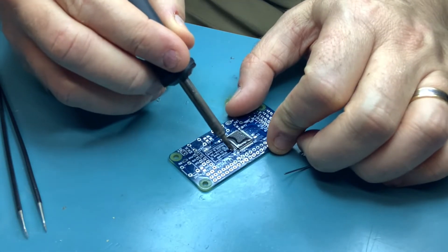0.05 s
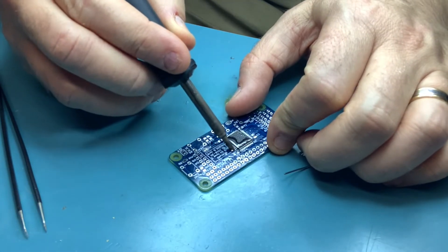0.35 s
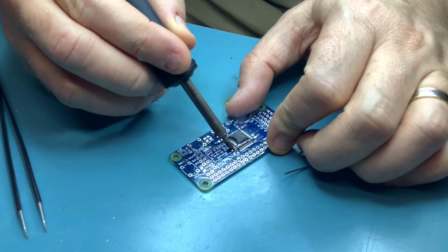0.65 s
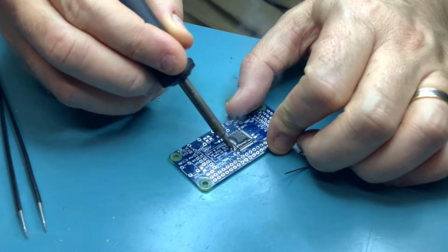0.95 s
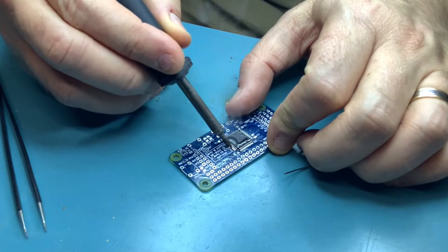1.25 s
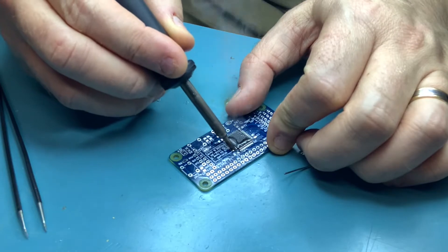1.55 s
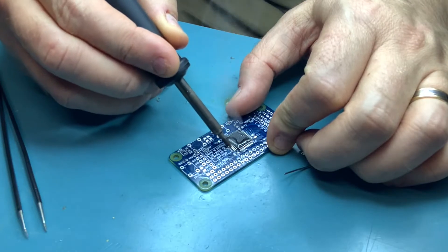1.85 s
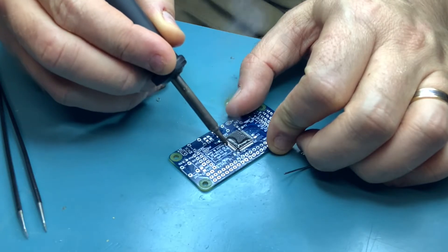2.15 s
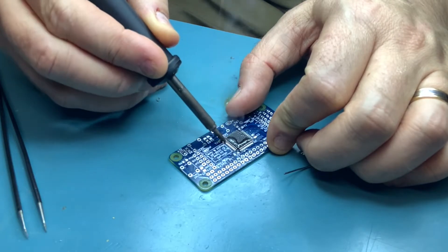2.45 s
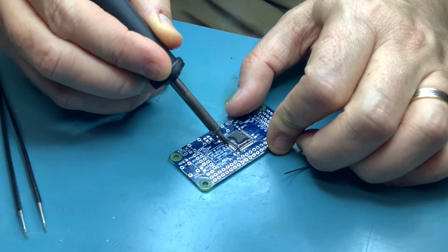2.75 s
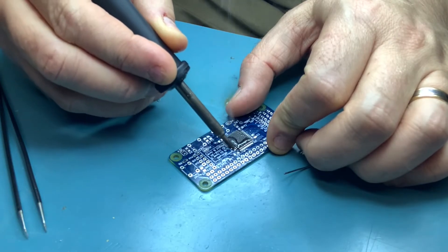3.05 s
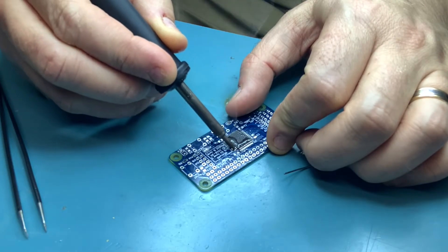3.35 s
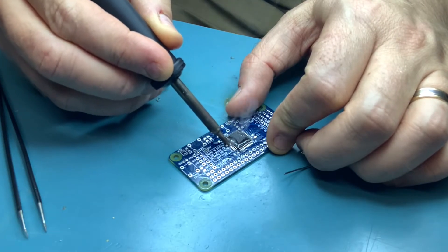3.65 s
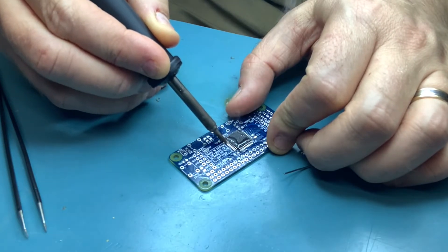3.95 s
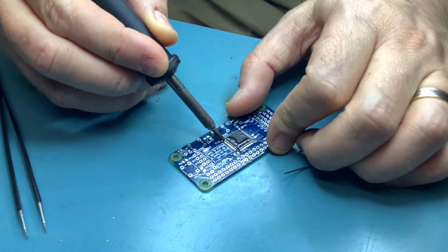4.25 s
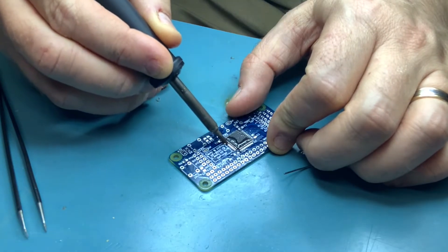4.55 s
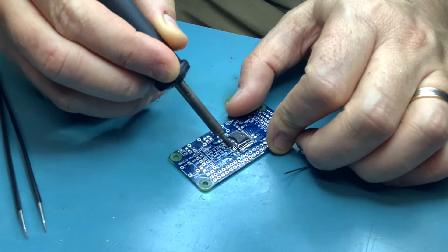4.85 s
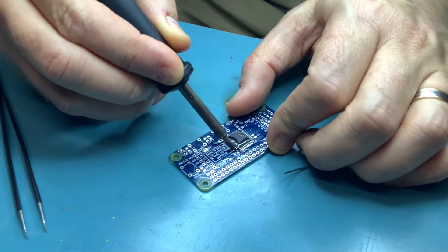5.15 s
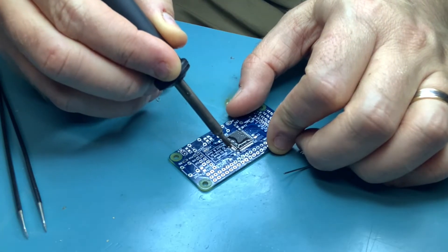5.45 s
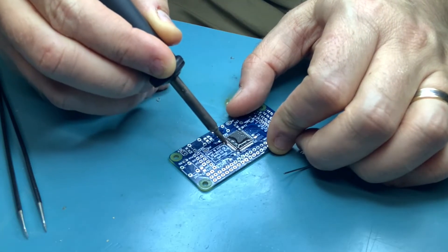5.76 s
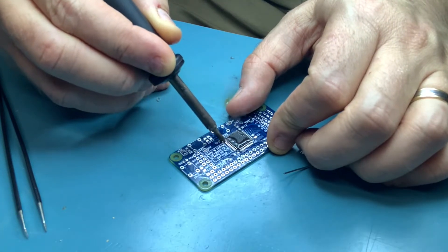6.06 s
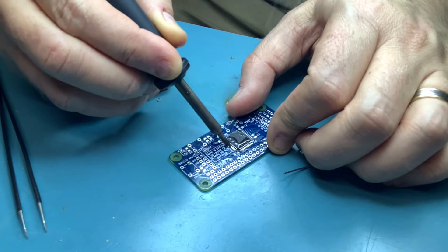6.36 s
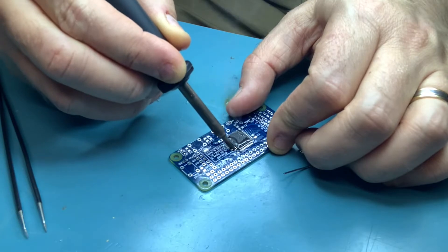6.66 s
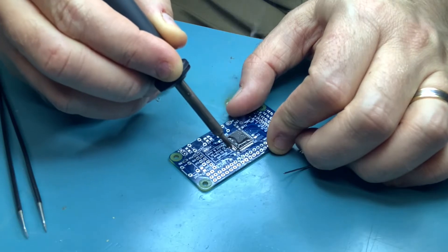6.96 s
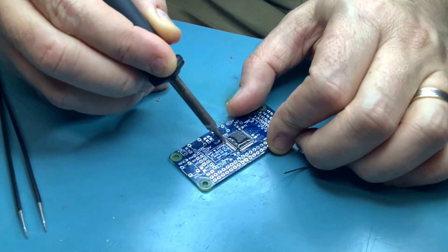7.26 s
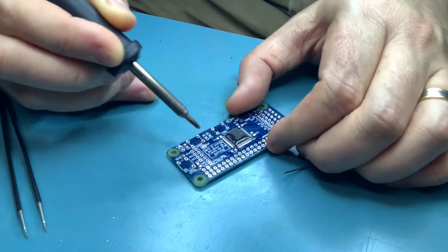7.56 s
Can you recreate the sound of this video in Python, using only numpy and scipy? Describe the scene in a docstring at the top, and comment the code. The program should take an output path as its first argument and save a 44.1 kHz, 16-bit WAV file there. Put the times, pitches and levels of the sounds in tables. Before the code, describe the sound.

Flux sizzles and spits in strokes under a soldering iron on a circuit board, over a steady low electrical hum.

```python
"""At a workbench, a soldering iron is dragged along the pins of a chip on a small circuit board.
Flux boils under the tip: countless tiny bubbles burst into a bright sizzle, larger ones spit,
lone ones tick. Board, hands and bench colour every burst. The tip knocks and rubs on the board.
A mains transformer hums over a low room rumble."""
import sys
import numpy as np
from scipy import signal
from scipy.fft import rfft, irfft, next_fast_len
from scipy.io import wavfile

SR = 44100
rng = np.random.default_rng(int(sys.argv[2]) if len(sys.argv) > 2 else 0)


def materialize(psi):
    """Save the field psi as 16-bit PCM at rate SR to the path in sys.argv[1].

    A 1-D psi becomes a single channel; in a 2-D psi each row is a channel.
    """
    bounded = np.clip(np.atleast_2d(psi).T, -1, 1)
    quanta = np.round(bounded * 32767).astype(np.int16)
    wavfile.write(sys.argv[1], SR, quanta)


N = 335107
TIME_S = np.arange(N) / SR

# room rumble and hiss: freq_hz, density_db
ROOM_SPECTRUM = [(3, -61.5), (12, -56.5), (21, -77), (42, -78), (52, -72.5), (64, -82.5), (95, -80.5),
                 (118, -94.5), (175, -94.5), (260, -102), (650, -109), (900, -114), (1550, -115),
                 (3000, -119.5), (15000, -124)]
# transformer hum: mains_multiple, rms_db
HUM_HARMONICS = [(2, -59), (3, -79.5), (4, -65), (6, -99), (8, -83), (10, -102.5), (12, -85.5), (16, -93)]
# broad spectrum of one burst: freq_hz, gain_db
BUBBLE_SPECTRUM = [(60, -37), (160, -29.5), (250, -20.5), (500, -14), (900, -14), (1200, -15.5),
                   (1800, -27), (2600, -12), (4200, -12.5), (7000, -8), (10500, -7.5), (13000, -2),
                   (15600, -14.5)]
# peaks and notches of the board and the hollow between the hands: centre_hz, width_hz, gain_db
BOARD_RESONANCES = [(596, 59, -5.8), (898, 132, -13.0), (1096, 83, 7.4), (1323, 107, 8.5), (1860, 227, 9.8),
                    (2248, 50, 5.8), (2526, 71, 6.9), (3103, 68, -10.0), (3383, 50, -11.0),
                    (3583, 50, -8.9), (4008, 96, -7.8), (4210, 63, -6.4), (4330, 140, 6.3),
                    (4657, 405, -13.0), (4998, 825, 9.8), (5498, 321, -6.9), (5936, 185, -8.3),
                    (7529, 121, -5.9), (8317, 514, -13.0), (8708, 1200, 11.4), (9353, 91, 4.8),
                    (10476, 69, -5.7), (11680, 204, -6.7), (12183, 185, -10.4), (12475, 88, -9.8),
                    (12983, 104, -9.4), (13287, 464, -11.9), (14007, 257, -5.5), (14930, 268, -8.7),
                    (15605, 105, -10.5)]
# the colour of the bursts shifts as the strokes go on; tip position weights the 9 kHz ring: time_s, low_db,
# ring_db, top_db
BURST_COLOUR = [(0.7, 1.5, -4.5, 6), (1.5, -1.9, -2, 6.5), (2.4, -0.9, -0.2, 4), (3.8, 0.5, 0.2, 7),
                (4.55, 4, -0.5, 3), (5.7, -2.5, 0, 4), (6.3, -4, -2, 6), (7.35, -4, -1, 6)]
# reflections off things on the bench: delay_ms, gain_db
BENCH_ECHOES = [(3.945, -16), (9.7, -24)]
# brief dabs at the flux: start_s, length_s, boil_db
TIP_DABS = [(0.21, 0.013, -58), (0.275, 0.04, -50), (2.78, 0.04, -57), (4.01, 0.032, -67),
            (4.125, 0.027, -54), (4.225, 0.068, -73.5), (4.463, 0.0073, -64), (4.497, 0.087, -61),
            (4.514, 0.032, -50), (4.868, 0.02, -72.5), (5.072, 0.0097, -79), (5.538, 0.024, -69),
            (5.61, 0.057, -72), (6.58, 0.14, -69.5), (6.728, 0.026, -50.5), (6.8, 0.1, -56.5),
            (6.9, 0.14, -64), (7.53, 0.065, -75.5)]
# one long stroke along the pins: time_s, boil_db
LONG_STROKE = [(0.314, -44.5), (0.479, -45.5), (0.933, -41.5), (1.013, -45.5), (1.122, -42), (1.142, -43.5),
               (1.227, -42.0), (1.387, -46.5), (2.045, -44.0), (2.07, -54.5), (2.11, -45.5), (2.14, -57),
               (2.16, -41.5), (2.2, -52.5), (2.295, -47.5), (2.325, -50), (2.519, -45.5), (2.669, -55.5),
               (2.749, -48.5), (2.769, -49.5)]
# four shorter strokes, a curve each: time_s, boil_db
SHORT_STROKES = [
    [(2.829, -45), (2.948, -48.5), (3.043, -52), (3.063, -44), (3.248, -56), (3.412, -48), (3.612, -51.5),
     (3.632, -61.5), (3.652, -51)],
    [(3.756, -48.5), (3.786, -51), (3.891, -49.5), (3.986, -61)],
    [(5.667, -51), (5.732, -45.5), (5.797, -48), (6.081, -48), (6.221, -53), (6.266, -59), (6.361, -47.5),
     (6.535, -56)],
    [(7.004, -50), (7.069, -54), (7.089, -59), (7.119, -51.0), (7.278, -50.5), (7.383, -58.5), (7.413, -56)],
]
# tip lands or drops between pins: start_s, level_db, contact_cutoff_hz
TIP_KNOCKS = [(0.268, -71.5, 2000), (0.282, -52, 250), (3.351, -64.5, 870), (4.739, -49.5, 149),
              (6.056, -64, 610)]
# board on its rubber mat: pitch_hz, gain_db, t60_s
BOARD_MODES = [(174, -1.5, 0.13), (307, -4, 0.07), (408, 7, 0.033), (494, -2, 0.054), (675, 10.5, 0.045),
               (1570, 15, 0.039)]
# large bubbles: start_s, level_db
LARGE_SPITS = [(0.3438, -30.0), (0.6617, -25.0), (1.6304, -29.5), (1.8264, -28.0), (1.8674, -29.0),
               (2.0404, -28.5), (2.1124, -31.5), (2.5228, -29.0), (2.5454, -31.0), (2.5968, -31.5),
               (2.7506, -33.0), (2.809, -34.5), (2.8266, -27.5), (2.9476, -30.5), (3.1854, -30.0),
               (3.3399, -29.0), (3.3538, -27.0), (3.4656, -31.5), (3.7092, -41.0), (3.7539, -34.5),
               (3.9558, -37.5), (3.9679, -34.5), (4.0049, -36.5), (4.0644, -47.0), (4.4923, -48.0),
               (4.5109, -32.0), (4.5427, -36.0), (4.5674, -29.5), (4.5948, -41.0), (4.6105, -40.0),
               (5.6058, -50.0), (5.6624, -40.0), (5.899, -31.5), (6.0814, -27.0), (6.3054, -34.5),
               (6.6399, -46.0), (6.6959, -46.0), (6.8256, -34.0), (6.8538, -41.0), (7.0003, -34.5),
               (7.2474, -32.0), (7.2689, -32.5), (7.2815, -28.5)]
# tip rubs over the pins: start_s, length_s, level_db
TIP_RUBS = [(1.697, 0.076, -68.5), (3.353, 0.17, -76), (3.796, 0.18, -77), (4.513, 0.11, -70.5),
            (5.3, 0.19, -71), (6.054, 0.36, -72), (6.827, 0.27, -71.5)]

CUTOFF_HZ = 15800
RING_FFT_SAMPLES = 8192
BURSTS_PER_S, REFERENCE_BOIL_DB = 7000, -45  # rate at that boil level
FLARE_DB_PER_S, QUENCH_DB_PER_S = 2998, 1150  # tip meets flux, tip leaves
SIMMER_DB, SIMMER_FADE_DB_PER_S = -30, 61  # relative to the contact
SMALL_SPITS_PER_S, SMALL_SPIT_DB, SMALL_SPIT_SPREAD_DB = 16, 10, 2.5  # relative to the boil


def from_db(db):
    """Decibels to gain."""
    return 10 ** (np.asarray(db) / 20)


def unit_rms(x):
    """Scale to rms 1."""
    return x / np.sqrt(np.mean(x ** 2) + 1e-20)


def in_time(rows):
    """Each column of a curve at every sample."""
    times_s, *columns = np.transpose(rows)
    return [np.interp(TIME_S, times_s, column) for column in columns]


def at_hz(points, hz):
    """Spectrum in dB, interpolated over log frequency."""
    points_hz, db = np.transpose(points)
    return np.interp(np.log(np.maximum(hz, 1)), np.log(points_hz), db)


def peak(hz, centre_hz, width_hz):
    """Resonance curve of height 1."""
    return 1 / (1 + (2 * (hz - centre_hz) / width_hz) ** 2)


def noise(gain_at):
    """Gaussian noise shaped by a gain over frequency."""
    size = next_fast_len(N)
    hz = np.arange(size // 2 + 1) * SR / size
    return irfft(rfft(rng.standard_normal(size)) * gain_at(hz), size)[:N]


def drift(rate_hz):
    """Smooth random wander, rms 1."""
    return unit_rms(noise(lambda hz: hz / rate_hz / (1 + (hz / rate_hz) ** 2) ** 2))


def decay(impulses, fade_s):
    """Exponential tail on each impulse."""
    return signal.lfilter([1], [1, -np.exp(-1 / (fade_s * SR))], impulses + 1e-18)


def held_db(start_s, length_s, level_db, rise_db_per_s, fall_db_per_s):
    """Contact level: rise, hold, fall."""
    before_s = np.maximum(start_s - TIME_S, 0)
    after_s = np.maximum(TIME_S - start_s - length_s, 0)
    return level_db - rise_db_per_s * before_s - fall_db_per_s * after_s


def band(x, centre_hz, width_hz):
    """One broad resonant band."""
    return signal.lfilter(*signal.iirpeak(centre_hz, centre_hz / width_hz, fs=SR), x)


def room(drone_hz, drone_width_hz, drone_db):
    """Rumble falling into faint hiss, plus a narrow building drone."""
    drone = from_db(drone_db) * unit_rms(noise(lambda hz: peak(hz, drone_hz, drone_width_hz)))
    return drone + np.sqrt(SR / 2) * noise(lambda hz: from_db(at_hz(ROOM_SPECTRUM, hz)))


def hum(mains_hz, waver_db):
    """Transformer: mains harmonics, each wavering slightly."""
    out = np.zeros(N)
    for multiple, rms_db in HUM_HARMONICS:
        amplitude = np.sqrt(2) * from_db(rms_db - waver_db * drift(rate_hz=7.3))
        out += amplitude * np.sin(2 * np.pi * (multiple * mains_hz * TIME_S + rng.random()))
    return out


def ticks(per_s, level_db, spread_db):
    """Lone faint bubbles in flux left on the hot pins."""
    born = rng.random(N) < per_s / SR
    return born * from_db(level_db + spread_db * rng.standard_normal(N))


def disperse(spectrum, hz, spread_ms, round_trip_ms, feedback):
    """Bending waves run to and fro in the board; lows arrive later."""
    phase_per_ms = -2j * np.pi * hz / 1000
    lag = np.exp(phase_per_ms * spread_ms * (1 - hz / (2 * CUTOFF_HZ)))
    trip = np.exp(phase_per_ms * round_trip_ms)
    return spectrum * lag * (feedback + trip) / (1 + feedback * trip)


def board_ring():
    """Board response to one burst, peak 1."""
    half = RING_FFT_SAMPLES // 2
    hz = np.arange(half + 1) * SR / RING_FFT_SAMPLES
    db = at_hz(BUBBLE_SPECTRUM, hz)
    for centre_hz, width_hz, gain_db in BOARD_RESONANCES:
        db += gain_db * peak(hz, centre_hz, width_hz)
    # minimum phase: sharp front, ringing after
    cepstrum = irfft(np.log(from_db(db)))
    cepstrum[1:half] *= 2
    cepstrum[half + 1:] = 0
    spectrum = disperse(np.exp(rfft(cepstrum)), hz, spread_ms=0.8, round_trip_ms=0.72, feedback=0.8)
    ring = irfft(spectrum)[:half]
    return ring / np.abs(ring).max()


def bench(x, scatter_db, scatter_t60_s, room_db, room_t60_s):
    """Near reflections, quick scatter off clutter, faint room tail."""
    t = TIME_S[:SR // 3]
    response = np.zeros(len(t))
    response[0] = 1
    for delay_ms, gain_db in BENCH_ECHOES:
        response[round(delay_ms * SR / 1000)] += from_db(gain_db)
    for gain_db, t60_s in (scatter_db, scatter_t60_s), (room_db, room_t60_s):
        tail = rng.standard_normal(len(t)) * from_db(-60 * t / t60_s) * (t > 0.003)
        response += from_db(gain_db) * tail / np.linalg.norm(tail)
    return signal.fftconvolve(x, response / np.linalg.norm(response))[:N]


def boil(stroke_gain_db):
    """Boil level in dB: each contact flares, holds, then leaves a simmer."""
    strokes = [(rows[0][0], rows[-1][0] - rows[0][0], in_time(rows)[0] + stroke_gain_db)
               for rows in [LONG_STROKE, *SHORT_STROKES]]
    boil_db = np.full(N, -120.0)
    for start_s, length_s, level_db in strokes + list(TIP_DABS):
        contact_db = held_db(start_s, length_s, level_db, FLARE_DB_PER_S, QUENCH_DB_PER_S)
        simmer_db = held_db(start_s, length_s, level_db + SIMMER_DB, FLARE_DB_PER_S, SIMMER_FADE_DB_PER_S)
        boil_db = np.maximum(boil_db, np.maximum(contact_db, simmer_db))
    return boil_db


def swarms(per_s, fade_s, depth):
    """Sizzle gain: a collapse sets off a dying swarm of smaller ones."""
    starts = (rng.random(N) < per_s / SR) * rng.random(N)
    return 1 + depth * decay(starts, fade_s)


def sizzle(boil_db, spread_db, cap_sigma, surge_db, surge_hz, rate_exponent):
    """Tiny bubbles click in sputters; a harder boil makes more."""
    per_s = BURSTS_PER_S * from_db(rate_exponent * (boil_db - REFERENCE_BOIL_DB))
    chance = np.clip(per_s / SR, 0, 1)
    born = rng.random(N) < chance
    sizes = unit_rms(from_db(spread_db * np.minimum(rng.standard_normal(N), cap_sigma)))
    swarm = swarms(per_s=180, fade_s=0.00066, depth=1.1)
    sputter = unit_rms(swarm * from_db(-surge_db * drift(surge_hz)))
    signs = rng.choice([-1, 1], N)
    return born * signs * sizes / np.sqrt(chance) * sputter * from_db(boil_db)


def vapour(boil_db, share_db):
    """Escaping vapour: smooth hiss between bursts."""
    return from_db(boil_db + share_db) * rng.standard_normal(N)


def flux():
    """Sizzle, vapour, spits and ticks ring through the same board."""
    boil_db = boil(stroke_gain_db=-0.46)
    ring = board_ring()
    boiling = sizzle(boil_db, spread_db=7.0, cap_sigma=3.17, surge_db=0.7, surge_hz=160,
                     rate_exponent=0.75)
    boiling += vapour(boil_db, share_db=-14)
    drive = boiling / np.linalg.norm(ring)
    drive += spits(boil_db, large_gain_db=-1.3, spray_db=-25.5, spray_fade_s=0.0018)
    drive += ticks(per_s=29, level_db=-65.5, spread_db=0.5)
    sound = signal.fftconvolve(drive, ring)[:N]
    low_db, ring_db, top_db = in_time(BURST_COLOUR)
    low_pass = signal.butter(1, 2680, fs=SR, output="sos")
    sound += (from_db(low_db) - 1) * signal.sosfilt(low_pass, sound)
    sound += (from_db(ring_db) - 1) * band(sound, centre_hz=9100, width_hz=1900)
    sound += (from_db(top_db) - 1) * band(sound, centre_hz=14100, width_hz=1730)
    return bench(sound, scatter_db=-14.0, scatter_t60_s=0.04, room_db=-11.5, room_t60_s=0.25)


def knocks():
    """The board gives on its mat; soft contact wakes only the lowest modes."""
    out = np.zeros(N)
    for start_s, level_db, contact_cutoff_hz in TIP_KNOCKS:
        start = int(start_s * SR)
        t = TIME_S[:min(SR // 4, N - start)]
        for pitch_hz, gain_db, t60_s in BOARD_MODES:
            strength = from_db(level_db + gain_db) / np.hypot(1, (pitch_hz / contact_cutoff_hz) ** 2)
            mode = from_db(-60 * t / t60_s) * np.sin(2 * np.pi * pitch_hz * t)
            out[start:start + len(t)] += strength * mode
    return out


def spits(boil_db, large_gain_db, spray_db, spray_fade_s):
    """Larger bubbles: a click and a fine spray each. Small spits are random and scale with the boil."""
    born = rng.random(N) < SMALL_SPITS_PER_S / SR
    clicks = born * from_db(boil_db + SMALL_SPIT_DB + SMALL_SPIT_SPREAD_DB * rng.standard_normal(N))
    for start_s, level_db in LARGE_SPITS:
        clicks[int(start_s * SR)] += from_db(level_db + large_gain_db)
    spray = from_db(spray_db) * decay(clicks, spray_fade_s) * rng.standard_normal(N)
    return clicks + spray


def rubbing(band_hz, grain_db, grain_hz):
    """Uneven tip friction stirs only the low board resonances."""
    level_db = np.max([held_db(*rub, rise_db_per_s=176, fall_db_per_s=38) for rub in TIP_RUBS], axis=0)
    friction = rng.standard_normal(N) * from_db(grain_db * drift(grain_hz))
    ringing = signal.fftconvolve(friction, board_ring())[:N]
    band_pass = signal.butter(3, band_hz, "band", fs=SR, output="sos")
    return from_db(level_db) * unit_rms(signal.sosfilt(band_pass, ringing))


def scene():
    """Tip and boiling flux over hum and room, mono."""
    mix = knocks() + rubbing(band_hz=(232, 793), grain_db=3.0, grain_hz=60) + flux()
    mix += hum(mains_hz=49.97, waver_db=0.57)
    mix += room(drone_hz=30.0, drone_width_hz=1.2, drone_db=-63)
    return mix[None]


def record(dry):
    """Steep low-pass."""
    return signal.sosfilt(signal.ellip(12, 0.1, 80, CUTOFF_HZ, fs=SR, output="sos"), dry)


dry = scene()
out = record(dry)
materialize(out)
```